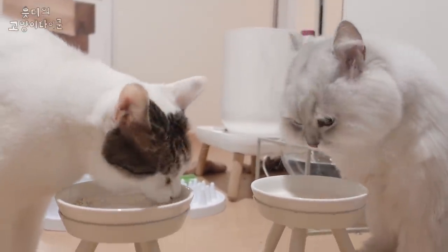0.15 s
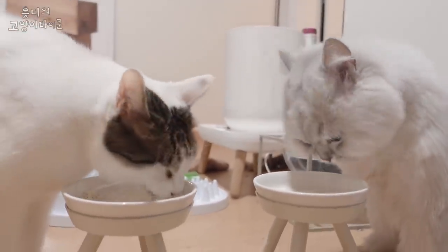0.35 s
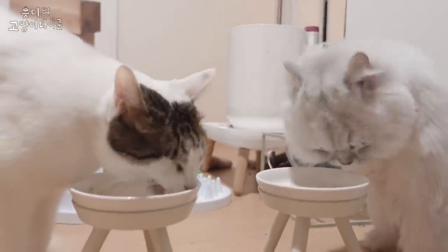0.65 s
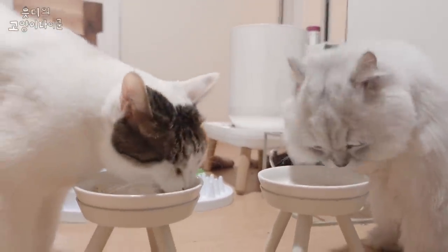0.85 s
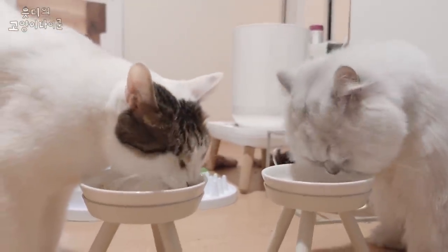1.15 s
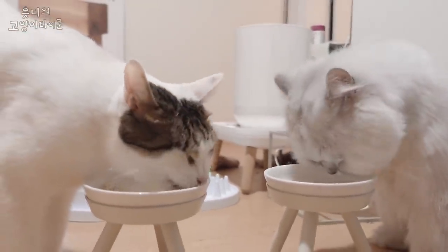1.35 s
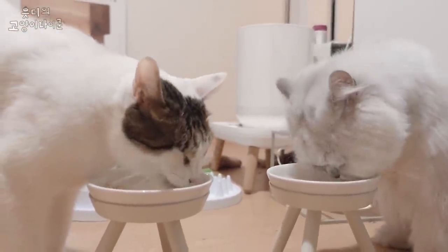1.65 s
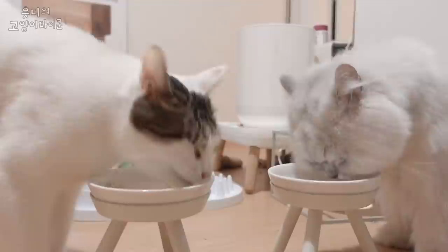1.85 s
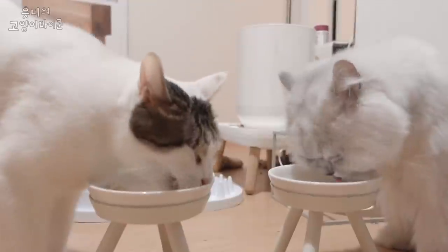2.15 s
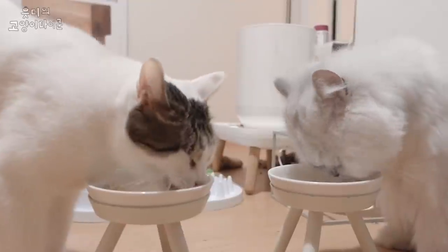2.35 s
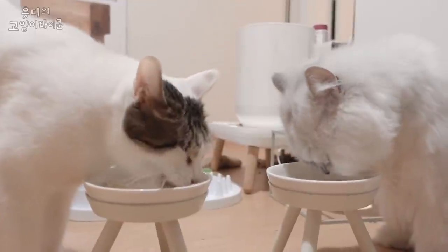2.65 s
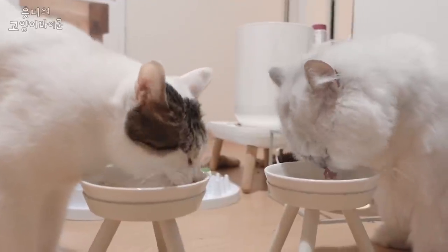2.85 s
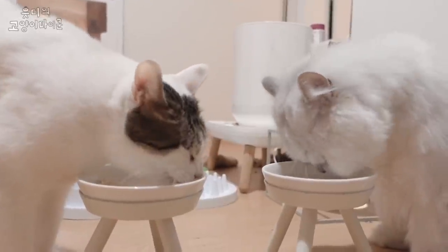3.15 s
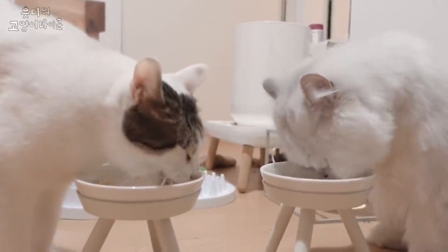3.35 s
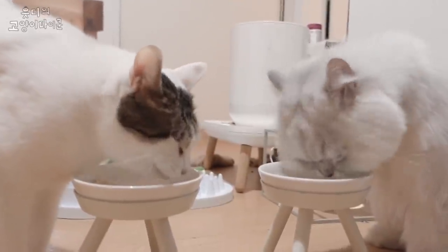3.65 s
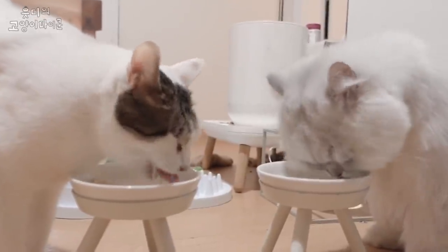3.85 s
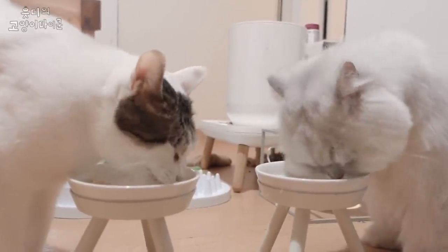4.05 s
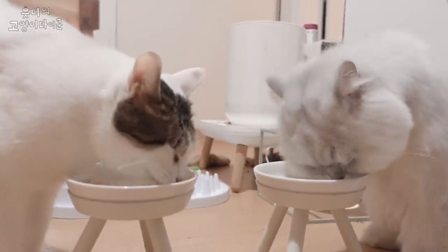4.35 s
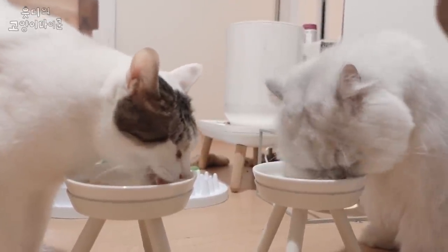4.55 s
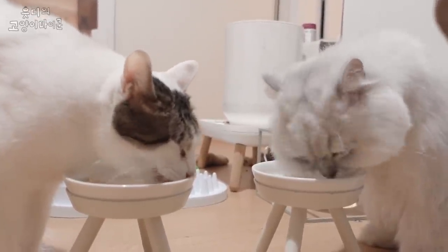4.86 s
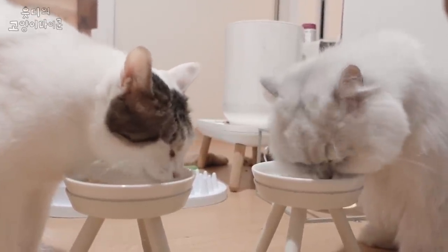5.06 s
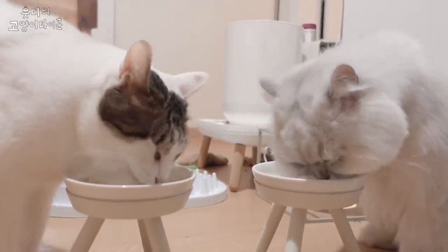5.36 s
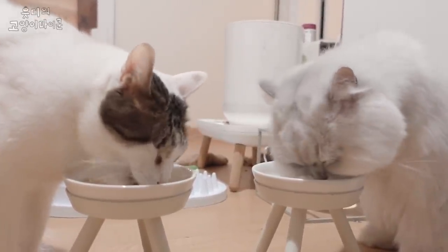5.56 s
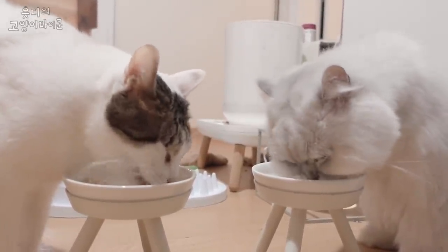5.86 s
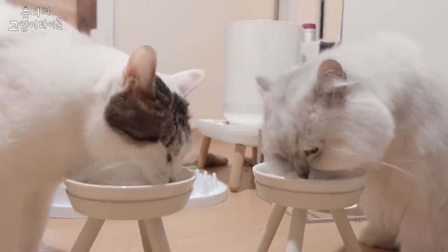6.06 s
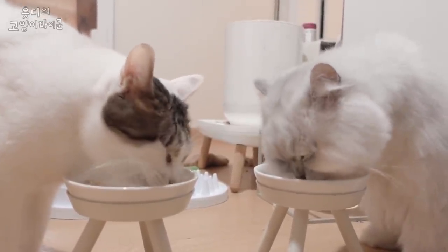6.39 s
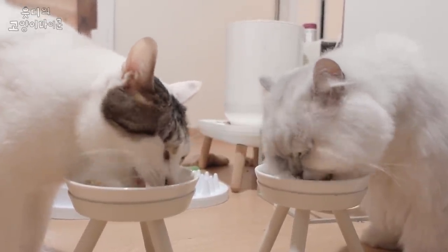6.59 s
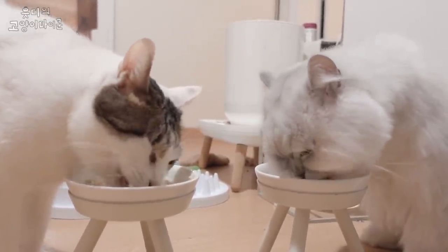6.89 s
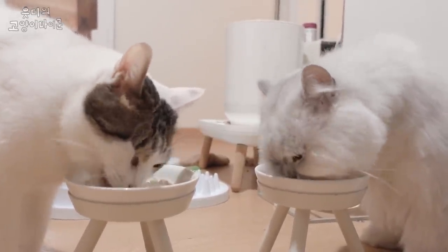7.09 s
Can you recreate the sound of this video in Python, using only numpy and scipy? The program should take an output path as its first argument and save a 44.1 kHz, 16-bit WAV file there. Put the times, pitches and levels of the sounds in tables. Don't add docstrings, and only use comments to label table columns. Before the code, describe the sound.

Two cats eat wet food close to the microphone, with irregular lip smacks, sticky clicks, fine wet crackle and low bumps from the bowl stands.

```python
import sys
import numpy as np
from scipy import signal
from scipy.fft import rfft, irfft, next_fast_len
from scipy.io import wavfile
from scipy.ndimage import uniform_filter1d, map_coordinates

SR = 44100
rng = np.random.default_rng(int(sys.argv[2]) if len(sys.argv) > 2 else 0)


def wrap_up_sound(samples):
    columns = np.atleast_2d(samples).T
    tamed = np.clip(columns, -1, 1)
    steps = np.round(tamed * 32767).astype(np.int16)
    wavfile.write(sys.argv[1], SR, steps)


def level_to_linear(level):
    exponent = np.asarray(level, float) / 20
    return 10 ** exponent


N = 318710

# centre_hz, width_hz, level_db
STAND_MODES = [(144, 14.8, 1), (218, 43, -4), (264, 12.4, 7.5), (344, 130, -5.5), (391, 95, -5),
               (589.8, 11.3, -7)]


def unit(x):
    return x / np.sqrt(np.mean(x ** 2) + 1e-20)


def noise():
    return rng.standard_normal(N)


def along(points, hz):
    f, v = np.transpose(points)
    return np.interp(np.log(hz + 1), np.log(f + 1), v)


def curve(rows):
    s, value = np.transpose(rows)
    return np.interp(np.arange(N) / SR, s, value)


def wobble(rate_hz):
    knots = rng.standard_normal(int(N * rate_hz / SR) + 4)
    return map_coordinates(knots, [np.arange(N) * rate_hz / SR])


def filtered(x, response):
    m = next_fast_len(N + SR // 2)
    return irfft(rfft(x, m) * response(np.fft.rfftfreq(m, 1 / SR)), m)[..., :N]


def resonant(modes):
    def response(f):
        total = 0
        for k, (centre_hz, width_hz, db) in enumerate(modes):
            damping = 1j * f * width_hz
            total = total + (-1) ** k * level_to_linear(db) * damping / (centre_hz ** 2 - f * f + damping)
        return total
    return response


def pops(s, db, hz, cycles, rise=1.0, size=400):
    turns = hz[:, None] * np.arange(size) / SR
    u = turns / cycles
    swell = (1 - np.exp(-(turns / rise) ** 2)) * np.exp(-2.2 * u)
    glide = 1 + 0.0028 * np.tanh(u)
    wave = swell / swell.max(1, keepdims=True) * np.sin(2 * np.pi * turns * glide)
    at = np.round(s * SR).astype(int)[:, None] + np.arange(size)
    return np.bincount(at.ravel(), (level_to_linear(db)[:, None] * wave).ravel(), N + SR)[:N]


def puffs(rows, width):
    out = np.zeros(N + SR)
    t = np.arange(SR // 4) / SR
    f = np.fft.rfftfreq(len(t), 1 / SR)
    for s, length_s, hz, db in rows:
        band = np.exp(-.5 * (np.log((f + 1) / hz) / width) ** 2)
        hiss = unit(irfft(rfft(rng.standard_normal(len(t))) * band, len(t)))
        u = np.clip(t / max(length_s, .01) / 1.265, 0, 1)
        out[round(s * SR):][:len(t)] += level_to_linear(db) * np.sin(np.pi * u ** 0.52) * hiss
    return out[:N]


def room_tone():
    # hz, level_db_per_hz
    air_spectrum = [(60, -9.5), (100, 3), (146, -22), (265, -6), (645, -17.5), (1170, -16.5), (2450, -32),
                    (3230, -34), (4720, -42.5), (7690, -60), (11700, -63), (15200, -73), (16200, -70)]
    hz, t, z = signal.stft(rng.standard_normal(N + 512), SR, nperseg=512)
    patches = uniform_filter1d(uniform_filter1d(rng.standard_normal(z.shape), 6, 0), 12, 1)
    air = signal.istft(z * level_to_linear(1.8 * unit(patches)), SR, nperseg=512)[1][:N]
    return level_to_linear(-44) * unit(filtered(air, lambda f: level_to_linear(along(air_spectrum, f))))


def leaning():
    # peak_s, peak_db
    lean_events = [(0.25, -23.5), (0.5, -26), (0.85, -30.5), (1.351, -15.5), (2.139, -19.5), (2.4, -34.5),
                   (2.749, -20.5), (3.44, -19), (3.642, -21.5), (3.9, -22.5), (3.961, -14), (4.04, -17),
                   (4.109, -22.5), (4.326, -22.5), (4.555, -33), (4.83, -27.5), (5.02, -18.5), (5.11, -14),
                   (5.257, -20), (5.43, -24.5), (6.139, -17), (6.309, -22.5), (6.58, -28.5), (6.85, -31),
                   (7.081, -15), (7.19, -17)]
    swell_db_per_s, ease_db_per_s, rest_db = 345, 208, -50.5
    t = np.arange(N) / SR
    level_db = np.full(N, rest_db)
    for s, db in lean_events:
        fall_db = np.maximum(swell_db_per_s * (s - t), ease_db_per_s * (t - s))
        level_db = np.maximum(level_db, db - fall_db)
    return level_db


def shaking():
    # time_s, level_db
    sway_level = [(0, -16), (.9, -15), (1.2, -21), (6.7, -23.5), (6.9, -14.5), (7.22, -21.5)]
    # hz, level_db_per_hz
    sway_spectrum = [(2, -8), (6, -5), (12, 23.5), (20, 6.5), (30, 8.5), (45, -17), (65, -12), (110, -73.5)]
    board_hz = 84
    push_db = leaning()
    sway = unit(filtered(noise(), lambda f: level_to_linear(along(sway_spectrum, f))))
    sway = level_to_linear(curve(sway_level) + 4.0 + 1.1 * wobble(11)) * sway
    boards = 2 ** .5 * np.sin(2 * np.pi * board_hz * np.arange(N) / SR + 0.8 * wobble(12))
    hum = level_to_linear(push_db - 1 + 1.8 * wobble(28)) * boards
    rub = unit(filtered(noise() * level_to_linear(2.6 * wobble(25)), resonant(STAND_MODES)))
    return sway + hum + level_to_linear(0.39 * (push_db + 32.5) - 45.5) * rub


def knocks():
    # start_s, peak_db, mode_hz
    nudge_events = [(0.352, -34.5, 156), (0.545, -29, 150), (0.589, -31.5, 416), (0.36, -34.5, 417),
                    (1.72, -35, 256), (2.455, -37, 256), (2.658, -38, 255), (4.539, -40, 215),
                    (5.2, -27, 140), (6.7, -41, 260), (0.658, -31, 166), (0.814, -24.5, 263),
                    (0.876, -27.5, 187), (1.328, -24, 283), (2.108, -24.5, 190), (2.237, -32, 143),
                    (2.796, -28.5, 264), (3.399, -25.5, 275), (3.612, -22, 153.5), (3.797, -28, 263),
                    (3.916, -17, 214), (3.95, -20.5, 252), (3.97, -24, 132), (4.787, -31, 148),
                    (4.99, -28, 149), (5.026, -20.5, 156), (5.116, -23, 178), (5.39, -29.5, 371),
                    (5.387, -26, 161.5), (6.13, -19.5, 282), (6.243, -33.5, 137), (6.365, -22.5, 242),
                    (6.371, -24, 143), (6.552, -23, 250), (7.055, -26.5, 260), (7.089, -32, 151),
                    (7.117, -19, 245)]
    # start_s, peak_db, floor_hz
    paw_events = [
        (1.325, -7, 41),
        (2.717, -12.5, 43),
        (4.304, -28, 50.3),
        (6.091, -6, 33),
        (6.127, -6.5, 92.5),
        (6.817, -7, 34.2),
    ]
    s, db, hz = np.transpose(nudge_events)
    nudges = level_to_linear(3.0) * pops(s, db, hz, cycles=6.65, rise=0.67, size=6000)
    impulses = np.bincount(np.round(s * SR).astype(int), level_to_linear(db), N)[:N]
    t = np.arange(SR // 4) / SR
    envelope = np.exp(-t / 0.028) * (1 - np.exp(-t / 0.0012))
    rattle = signal.fftconvolve(impulses, envelope)[:N] * noise()
    rattle = filtered(rattle, lambda f: resonant(STAND_MODES)(f) * f / (f + 150) / (1 + (f / 620) ** 4))
    thuds = pops(*np.transpose(paw_events), cycles=2.1, rise=0.43, size=12000)
    return nudges + level_to_linear(20.0) * rattle + thuds


def sniffs():
    # start_s, length_s, whistle_hz, level_db
    nose_puffs = [
        (.3, 0.0099, 3700, -46.5),
        (1.82, 0.029, 4400, -70),
        (2.865, 0.06, 4280, -43),
        (3.50, 0.058, 2820, -45),
        (3.81, 0.12, 5700, -59),
        (5.80, 0.068, 3300, -45.5),
        (6.649, 0.038, 2620, -54),
        (6.86, 0.073, 4570, -55.5),
    ]
    return level_to_linear(2 * wobble(90)) * puffs(nose_puffs, width=.08)


def lapping(count=2600):
    # time_s, level_db
    stir_level = [(0.0, -33), (0.19, -42), (0.25, -43.5), (0.64, -45.5), (0.74, -44), (1.45, -47),
                  (1.58, -43.5), (2.92, -43), (3.05, -46.5), (3.25, -40), (3.57, -40.5), (3.66, -42.5),
                  (4.85, -41.5), (5.88, -41), (6.06, -49.5), (6.16, -39), (6.37, -46), (7.22, -41.5)]
    when, size, pitch = rng.random((count, 3)).T
    s, hz = when * N / SR, 1000 * 7 ** pitch
    tick_db = -3.5 * np.log(size + 0.06) - 3 * np.log2(hz / 1000)
    ticks = pops(s, tick_db, hz, cycles=4.8, rise=0.6, size=300)
    crack_db, crack_hz = -3.5 * np.log(size[::4] + 0.04), 7500 + 6000 * pitch[::4]
    cracks = pops(s[::4], crack_db, crack_hz, cycles=4, rise=1.5, size=60)
    hiss = filtered(noise(), lambda f: 1 / (1 + f / 2500))
    fizz = filtered(noise(), lambda f: np.exp(-(np.log((f + 1) / 10500) / 0.42) ** 2))
    fizz = level_to_linear(8.0 * wobble(24)) * fizz
    wet = unit(ticks) + level_to_linear(-14) * unit(cracks) + level_to_linear(-5.5) * unit(hiss) + level_to_linear(-17) * unit(fizz)
    return level_to_linear(curve(stir_level) - 8.0 + 2.2 * wobble(28)) * unit(wet)


def licks(count=18):
    # start_s, length_s, cavity_hz,
    # level_db
    lick_strokes = [(0.08, 0.072, 1850, -41), (0.347, 0.17, 1650, -49.5), (0.411, 0.2, 1650, -46.5),
                    (0.812, 0.042, 1210, -43), (1.057, 0.061, 1110, -53), (1.167, 0.034, 1940, -47),
                    (1.629, 0.061, 2050, -63), (1.667, 0.077, 1130, -44.5), (2.143, 0.055, 1310, -47),
                    (2.195, 0.045, 1600, -49), (2.24, 0.055, 2000, -64), (2.42, 0.045, 1950, -61),
                    (2.862, 0.04, 1960, -49.5), (5.96, 0.05, 2270, -55), (2.988, 0.05, 1880, -50),
                    (3.651, 0.051, 1430, -49), (3.899, 0.056, 1160, -58), (3.979, 0.035, 1700, -42),
                    (4.171, 0.056, 2000, -45), (4.566, 0.067, 1220, -55), (4.968, 0.043, 1660, -45),
                    (5.262, 0.046, 1340, -51), (5.552, 0.047, 2460, -51), (6.149, 0.059, 1280, -41),
                    (6.16, .05, 2320, -46.5), (6.498, 0.046, 2040, -47), (6.977, 0.052, 2530, -55),
                    (7.116, 0.073, 1170, -44),
                    (0.089, 0.053, 3600, -40), (0.574, 0.098, 3700, -51.5), (0.741, 0.047, 4750, -50),
                   (0.815, 0.053, 4560, -50.5), (1.159, 0.13, 2670, -45.5), (1.21, 0.038, 5300, -51.5),
                   (2.172, 0.07, 5470, -48), (2.63, 0.17, 5760, -64), (2.643, 0.034, 3580, -45),
                   (2.776, 0.06, 3640, -49), (3.024, 0.041, 3700, -51.5), (3.194, 0.054, 6600, -51.5),
                   (3.826, 0.13, 4440, -53), (4.171, 0.058, 4870, -50), (4.3, 0.033, 4830, -51.5),
                   (4.595, 0.035, 6570, -50.5), (4.881, 0.038, 4500, -53), (5.562, 0.06, 6800, -51),
                   (4.972, 0.06, 5960, -67), (5.547, 0.1, 5100, -48), (6.163, 0.024, 4040, -69),
                   (6.497, 0.066, 4100, -57), (6.978, 0.039, 5230, -50), (6.979, 0.061, 3570, -53)]
    # start_s, level_db
    gravy_fizz = [(0.071, -51), (0.421, -42), (0.602, -52.5), (1.14, -55), (1.27, -57), (2.461, -78),
                  (2.665, -53), (2.771, -54), (2.866, -51), (3.021, -52), (3.31, -68), (3.367, -49),
                  (3.885, -48), (4.29, -58), (4.55, -58), (4.791, -59), (4.89, -53.5), (5.805, -51),
                  (6.161, -57)]
    fizz_s, fizz_hz = 0.054, 9500
    strokes = lick_strokes + [(s, fizz_s, fizz_hz, db) for s, db in gravy_fizz]
    s, length_s, hz, db = np.repeat(strokes, count, axis=0).T
    when, pitch, size = rng.random((len(s), 3)).T
    pocket_hz = hz * np.exp(.22 * (pitch - .5) + 0.28 * (when - .5))
    pocket_db = db + 1.5 - 4.3 * np.log(size + 0.035)
    pockets = pops(s + when * length_s, pocket_db, pocket_hz, cycles=5, rise=1.3)
    cavity = level_to_linear(-7 + 5.6 * wobble(120)) * puffs(strokes, width=0.096)
    surface = level_to_linear(-6.5 + 5.3 * wobble(150)) * puffs(strokes, width=0.53)
    return pockets + cavity + surface


def crackle():
    # start_s, peak_db, pitch_hz
    chew_pops = [(0.077, -31.5, 1270), (0.111, -23, 1600), (0.122, -23, 2500), (0.14, -31.0, 2460),
                 (0.155, -30.5, 1800), (0.4367, -29, 2440), (0.4673, -35, 2130), (0.8323, -26, 1250),
                 (1.1596, -34.0, 2450), (1.169, -25.5, 2700), (1.3618, -40, 1430), (1.6393, -27.5, 1860),
                 (1.6693, -32, 2320), (1.683, -22, 1190), (1.9115, -33, 1940), (1.9259, -35.0, 2370),
                 (2.1812, -20.5, 1380), (2.2225, -26, 1720), (2.3462, -33.5, 1850), (2.444, -33, 2080),
                 (2.4589, -30.5, 1980), (2.5808, -35, 1980), (2.6045, -35, 1480), (2.6281, -32.5, 1450),
                 (3.0413, -30, 2260), (3.2362, -35.0, 2140), (3.3867, -33.0, 2580), (3.5197, -31, 2000),
                 (3.6637, -24, 1680), (3.6744, -21.5, 1690), (3.7118, -29.5, 1310), (3.8896, -30, 1780),
                 (3.9385, -27, 1280), (3.9775, -33.0, 1680), (4.1798, -34, 2060), (4.2073, -29.5, 2070),
                 (4.315, -36, 1510), (4.493, -30, 1950), (4.5991, -31, 1720), (4.9074, -32, 2610),
                 (5.2656, -21, 1310), (5.304, -29.5, 1340), (5.341, -33.5, 1350), (5.3905, -29.5, 2350),
                 (5.5, -32.5, 2460), (5.669, -31, 2360), (5.746, -36, 1430), (5.8703, -34.5, 2400),
                 (5.981, -34, 1220), (6.2008, -27, 1330), (6.6515, -28, 2560), (6.8612, -34.5, 2360),
                 (6.9094, -31, 2520), (7.0061, -27.5, 2560), (7.1513, -37, 1260)]
    # start_s, peak_db, pitch_hz
    tongue_ticks = [(0.0614, -31, 3800), (0.1037, -32, 3770), (0.1269, -26.5, 3750), (0.259, -41, 3660),
                    (0.3054, -35, 3800), (0.4125, -24, 3700), (0.834, -32, 4960), (0.9365, -35, 4300),
                    (1.1704, -32.5, 5300), (1.221, -29.5, 5650), (1.2285, -26, 5660), (1.5031, -35.5, 4570),
                    (1.5833, -39.5, 3900), (1.648, -39.5, 4780), (1.915, -39.5, 4500), (1.9407, -45, 4690),
                    (1.9719, -40, 3600), (2.1979, -34, 4800), (2.2464, -32, 3730), (2.382, -34, 3600),
                    (2.4313, -42, 4800), (2.5938, -48, 3140), (2.63, -31, 3550), (2.6506, -38, 5200),
                    (2.676, -40, 3650), (2.694, -36, 5100), (3.0415, -39, 3400), (3.212, -33, 6460),
                    (3.2695, -33, 3640), (3.5209, -34.5, 5000), (3.5426, -37.5, 3830), (3.6442, -45, 3320),
                    (3.712, -38.5, 6000), (3.7487, -38, 3550), (3.8626, -28.5, 4370), (3.9413, -46, 3800),
                    (4.188, -32.5, 4960), (4.234, -37, 4040), (4.2798, -35.5, 3880), (4.4208, -38.5, 5350),
                    (4.7645, -41, 4200), (4.868, -34, 3490), (4.896, -39, 4820), (4.9289, -43, 4610),
                    (4.9948, -46, 3830), (5.0204, -40.5, 3750), (5.5763, -26, 3500), (5.8167, -32, 3450),
                    (6.1564, -31, 4110), (6.202, -37, 4000), (6.5026, -40, 3500), (6.5125, -40, 4500),
                    (6.9943, -38, 4000), (7.001, -33, 3770), (7.047, -37, 3600)]
    # start_s, peak_db, pitch_hz
    film_sparks = [(1.1519, -47, 8550), (1.1649, -44, 9450), (1.1904, -47.5, 9540), (1.9408, -48, 7520),
                   (2.0999, -50.0, 9220), (2.1978, -53, 8550), (2.2071, -55, 8680), (2.362, -45.5, 10870),
                   (2.594, -50.0, 9500), (2.6645, -37, 7100), (2.6938, -41.5, 10340), (2.769, -42, 7200),
                   (3.2134, -53, 7690), (3.4153, -42, 9260), (3.4224, -43, 8720), (3.7123, -45, 7200),
                   (3.8176, -44.0, 9100), (3.8408, -44, 8940), (3.9492, -43, 11390), (4.58, -46, 9840),
                   (4.8948, -42, 7340), (5.2217, -50.5, 8550), (5.2791, -50.0, 10380), (5.683, -49, 10530),
                   (5.8074, -47, 9710), (5.814, -45, 9750), (5.82, -43.0, 8980), (5.987, -52.0, 10440),
                   (6.5441, -49, 9820), (7.0836, -51.0, 9500)]
    trail_s, trail_db = 0.052, -27
    chews = pops(*np.transpose(chew_pops), cycles=4.7, rise=0.85)
    ticks = level_to_linear(1.8) * pops(*np.transpose(tongue_ticks), cycles=4.9, rise=1.25)
    sparks = level_to_linear(12.0) * pops(*np.transpose(film_sparks), cycles=6.2, rise=1.2)
    sources = chew_pops + tongue_ticks + film_sparks
    trails = puffs([(s, trail_s, hz, db + trail_db) for s, db, hz in sources], width=0.12)
    return chews + ticks + sparks + trails


def smacks():
    # start_s, peak_db, pitch_hz
    mouth_pops = [(0.026, -27, 1790), (0.087, -17.5, 1570), (0.1125, -19.5, 1610), (0.4222, -18.5, 1840),
                  (0.4538, -17.5, 1760), (0.4946, -20, 1680), (0.55, -25.5, 1710), (0.598, -22.5, 1610),
                  (0.7411, -20, 2240), (0.7659, -23, 2600), (0.8528, -21.5, 1840), (1.1016, -25, 2760),
                  (1.188, -20, 2060), (1.191, -11.5, 1900), (1.241, -25, 1790), (2.2024, -16, 1600),
                  (2.2064, -14, 1610), (3.031, -23, 2000), (3.6534, -20, 1730), (4.5653, -27, 1670),
                  (4.8557, -26, 2400), (4.9691, -21, 1930), (5.5624, -7, 2400)]
    gulp_pops = [(2.1641, -18.5, 1210), (2.994, -21, 1410), (3.9054, -10.5, 1144), (4.5795, -17.5, 1120),
                 (5.2793, -17.5, 1350), (5.4459, -26.5, 1200), (5.552, -9, 1340), (5.696, -28, 1440),
                 (6.1542, -16, 1330), (6.2, -21.5, 1290), (6.5017, -27, 1200), (6.5119, -25, 1340),
                 (7.1269, -22, 1360)]
    bubble_pops = [
        (1.0728, -24.5, 1095),
        (1.5605, -26.5, 1640),
        (2.2457, -16.5, 1990),
        (4.2295, -25, 2060),
        (6.9807, -15.5, 2890),
    ]
    lip_smacks = [(0.025, -24.5, 3420), (0.0747, -25, 4060), (0.1057, -18, 3770), (0.1118, -15, 3750),
                  (0.119, -20, 3500), (0.3481, -14, 3680), (0.3543, -26, 3670), (0.3606, -7, 3690),
                  (0.4367, -15.5, 3980), (0.7659, -29.5, 3700), (1.19, -26, 2760), (2.1813, -22, 3740),
                  (2.1857, -20, 3840), (2.3456, -26.5, 3520), (2.603, -29, 3440), (2.7, -21.5, 3700),
                  (2.7694, -23, 3350), (3.0317, -30, 3120), (4.188, -27.5, 2800), (4.8588, -31, 4070),
                  (5.5506, -19.5, 3970), (6.159, -43, 4090), (6.8608, -30.5, 3900), (6.9807, -15, 3750),
                  (7.1491, -27.5, 4000)]
    tip_clicks = [(0.088, -24.5, 5100), (0.7413, -26.5, 4750), (0.8547, -26, 5140), (1.1016, -23.5, 4560),
                  (1.6801, -29.5, 5060), (1.831, -27.5, 4250), (2.1096, -21.5, 4440), (2.2073, -16, 4620),
                  (2.635, -23.5, 5440), (2.665, -28, 5730), (3.6654, -31, 4460), (3.8178, -19.5, 5560),
                  (3.891, -25.5, 6400), (3.993, -32.5, 4570), (4.1754, -30, 4600), (4.2033, -36, 4770),
                  (4.9074, -20, 4540), (5.6277, -24.5, 4400), (5.695, -28.5, 4660), (5.8821, -27.5, 4900)]
    film_snaps = [(0.077, -32, 10800), (0.1135, -34, 7460), (0.2232, -41, 11400), (0.2415, -43, 11300),
                  (0.4231, -29, 9500), (0.4372, -28, 8600), (0.7414, -40, 11740), (1.8176, -38, 10700),
                  (2.11, -37, 8330), (2.3823, -41, 10410), (2.488, -29.5, 10700), (2.6796, -32, 10800),
                  (3.3184, -32.5, 9050), (3.3336, -35, 11070), (3.3797, -31, 10400), (3.4011, -35, 9700),
                  (3.6819, -41, 9500), (3.891, -35, 9600), (4.1845, -42, 9900), (4.555, -43, 11900),
                  (4.795, -29.5, 11300), (5.0205, -45, 11630), (5.814, -46, 9740), (5.8827, -33, 9200),
                  (5.959, -42, 10500), (6.9808, -40, 10700), (6.993, -41, 11440)]
    low_rise, high_rise = 0.85, 1.25
    smack_hiss_s, smack_hiss_db = 0.063, -33

    mouth = pops(*np.transpose(mouth_pops), cycles=3.9, rise=low_rise)
    gulps = pops(*np.transpose(gulp_pops), cycles=2.1, rise=low_rise)
    bubbles = pops(*np.transpose(bubble_pops), cycles=12, rise=low_rise)
    s, db, hz = np.transpose(mouth_pops + gulp_pops)
    crack = pops(s, db - 11, np.full(len(s), 3900.0), cycles=2.2, rise=low_rise)

    lips = pops(*np.transpose(lip_smacks + tip_clicks), cycles=5.0, rise=high_rise)
    s, db, hz = np.transpose(lip_smacks)
    upper = pops(s, db - 21, hz * 1.48, cycles=12, rise=3.2)

    films = pops(*np.transpose(film_snaps), cycles=12, rise=5.9)
    film_cracks = level_to_linear(12.5) * pops(*np.transpose(film_snaps), cycles=2.2, rise=high_rise)

    sources = lip_smacks + tip_clicks + gulp_pops
    smack_hiss = puffs([(s - .008, smack_hiss_s, hz, db + smack_hiss_db) for s, db, hz in sources], width=0.24)
    smack_hiss = level_to_linear(4.8 * wobble(170)) * smack_hiss
    return mouth + gulps + bubbles + crack + lips + upper + films + film_cracks + smack_hiss


def bowl(x):
    # hz, level_db
    bowl_colour = [(700, -16), (1200, -3), (2700, 1.5), (3110, -2), (3600, -0.5), (5900, 3.5), (6250, -1),
                   (7900, -6.5), (8600, -7.5), (12000, -7), (13000, -11.5), (16000, -10)]
    # delay_s, level_db
    reflections = [
        (0.00078, -21),
        (0.0023, -16),
        (0.0041, -21),
    ]

    def response(f):
        echoes = sum(level_to_linear(db) * np.exp(-2j * np.pi * f * delay_s) for delay_s, db in reflections)
        return level_to_linear(along(bowl_colour, f)) * (1 + echoes)
    return filtered(x, response)


def room(x):
    # hz, t60_s
    decay_times = [(800, 0.26), (3000, 0.13), (10000, 0.13)]
    hz, t, z = signal.stft(rng.standard_normal(SR // 2), SR, nperseg=256)
    decay = level_to_linear(-60 * t / along(decay_times, hz)[:, None])
    tail = signal.istft(z * decay, SR, nperseg=256)[1]
    delayed = np.pad(x, (130, 0))
    return signal.fftconvolve(delayed, tail / np.linalg.norm(tail))[:N]


def scene():
    near = bowl(sniffs() + lapping() + licks() + crackle() + smacks())
    return (room_tone() + shaking() + knocks() + level_to_linear(-10.5) * room(near) + near)[None]


def roll_off(x):
    return signal.sosfilt(signal.butter(12, 16430, fs=SR, output="sos"), x)


def record(dry):
    edge_s, top_hz = 0.006, 15750
    edge = np.minimum(np.arange(N), np.arange(N)[::-1]) / (edge_s * SR)
    soft = dry * np.sin(np.pi / 2 * np.minimum(edge, 1)) ** 2
    return roll_off(filtered(soft, lambda f: f < top_hz))


dry = scene()
out = record(dry)
wrap_up_sound(out)
```